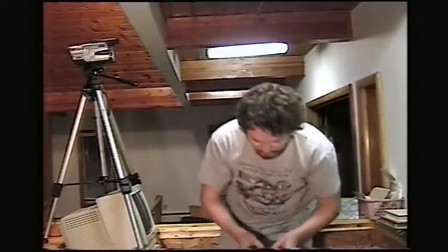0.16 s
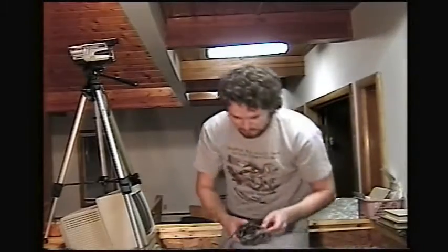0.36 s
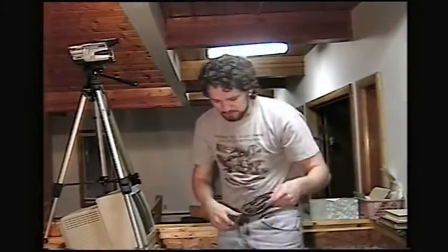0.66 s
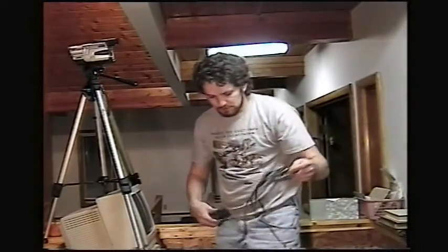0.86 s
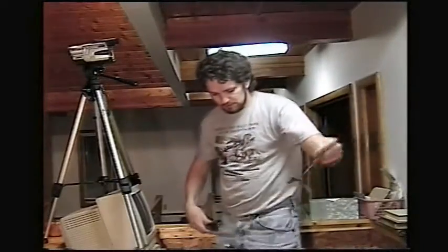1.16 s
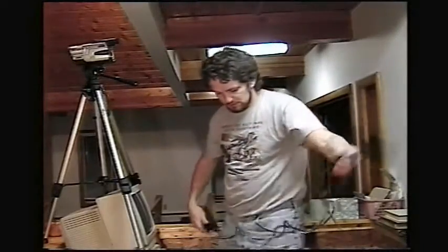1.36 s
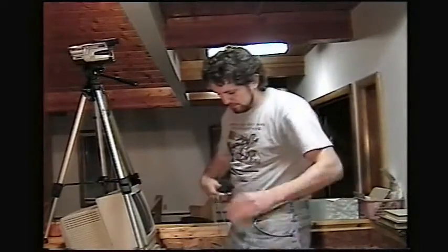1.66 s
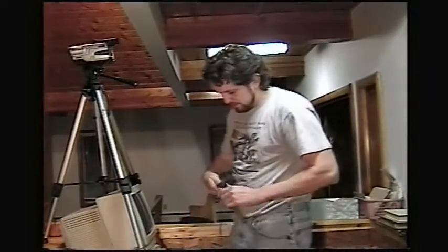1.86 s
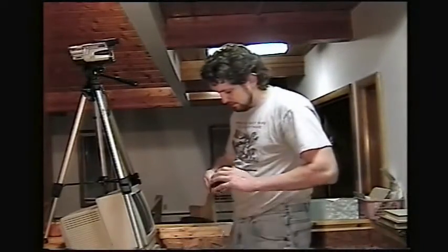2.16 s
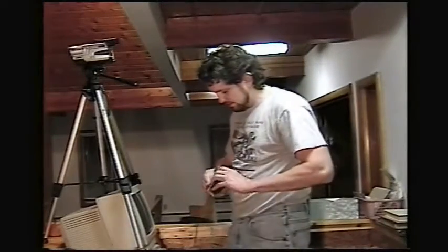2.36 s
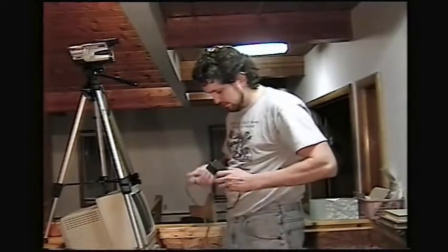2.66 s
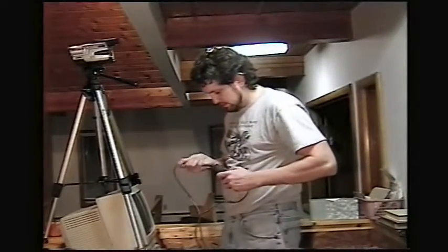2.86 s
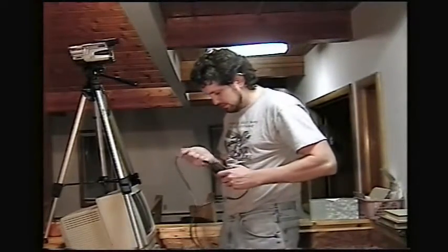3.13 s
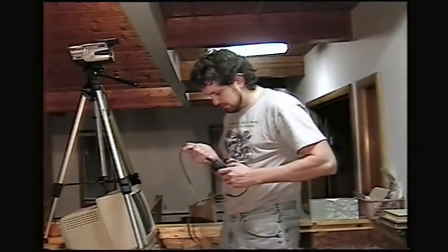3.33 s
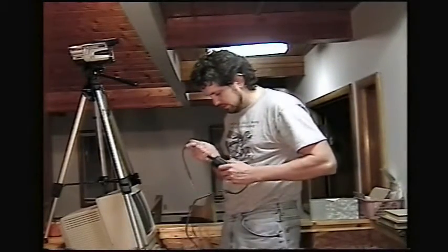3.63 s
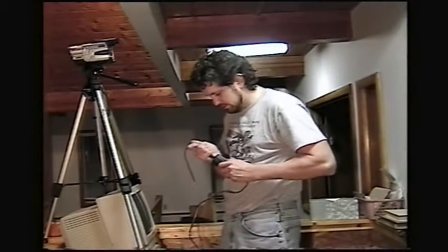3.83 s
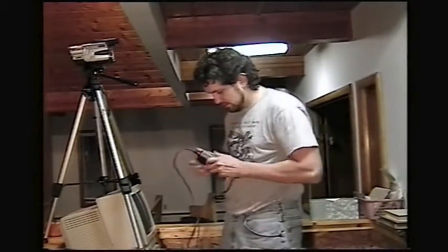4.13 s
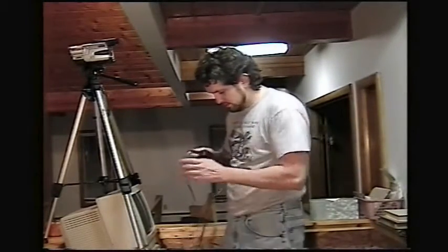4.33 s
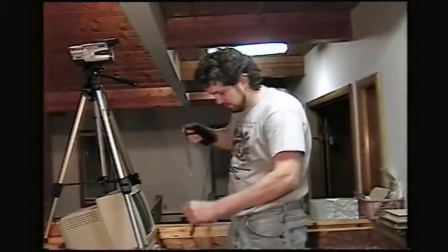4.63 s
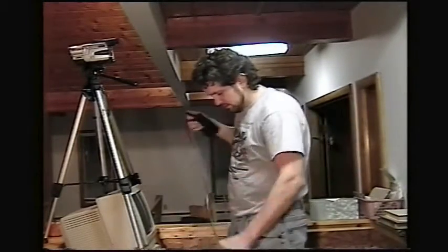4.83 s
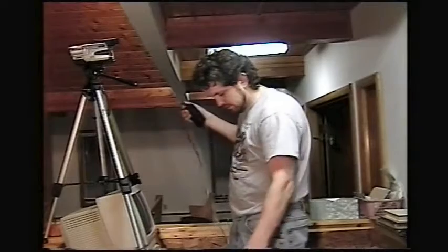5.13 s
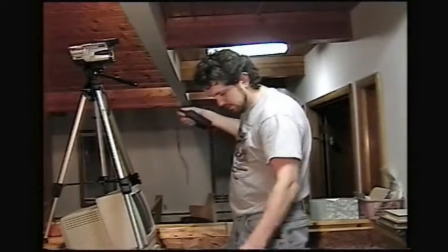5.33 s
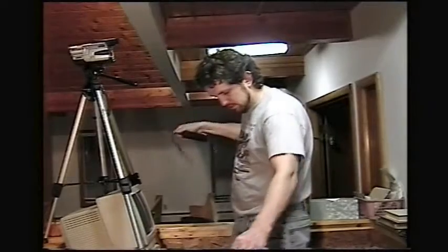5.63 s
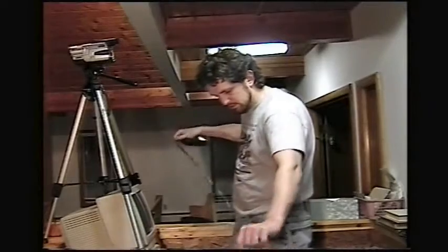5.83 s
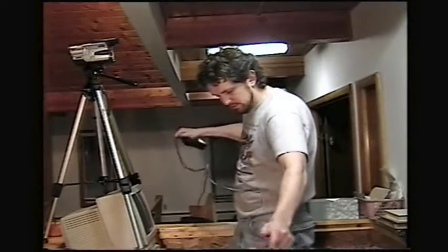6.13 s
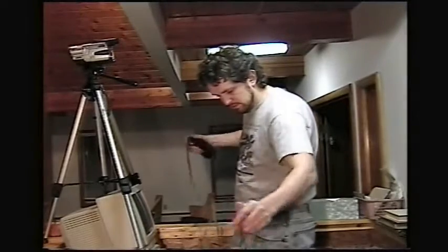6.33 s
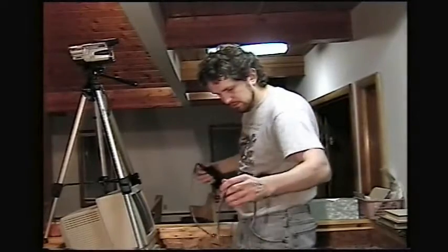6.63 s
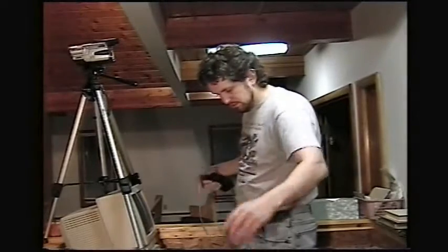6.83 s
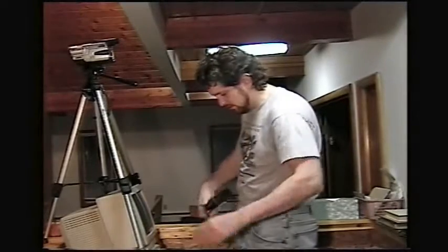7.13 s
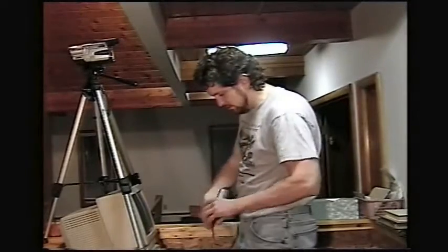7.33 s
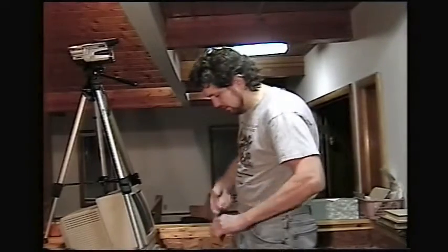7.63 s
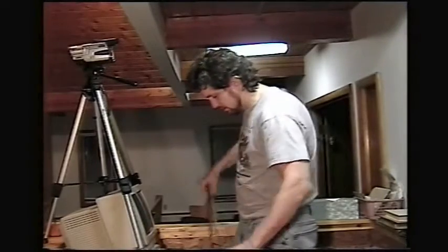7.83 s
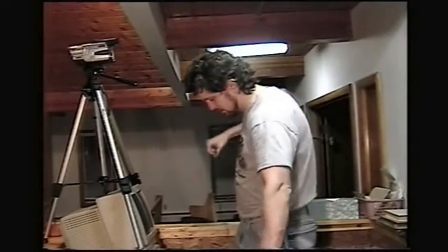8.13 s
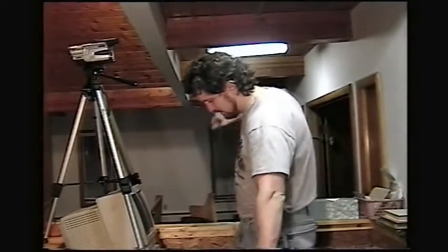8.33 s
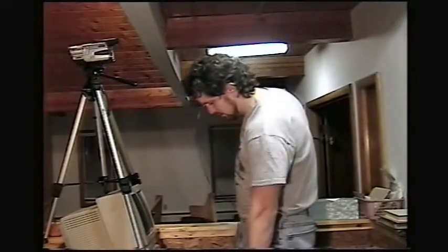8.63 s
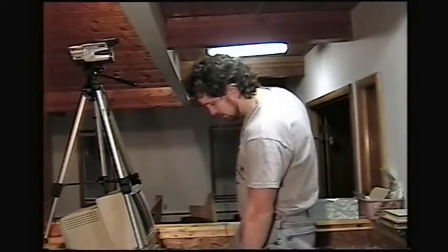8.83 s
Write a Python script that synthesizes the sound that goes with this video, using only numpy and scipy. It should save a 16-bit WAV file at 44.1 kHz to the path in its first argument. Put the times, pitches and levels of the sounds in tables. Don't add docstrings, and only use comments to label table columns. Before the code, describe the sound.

Indoors, a cord is uncoiled by hand: dry rustles and tiny squeaks, a clattering slap, then scattered hollow wooden knocks over a quiet lamp buzz.

```python
import sys
import numpy as np
from scipy import signal
from scipy.fft import rfft, irfft, next_fast_len
from scipy.io import wavfile
from scipy.ndimage import uniform_filter1d

SR = 44100
rng = np.random.default_rng(int(sys.argv[2]) if len(sys.argv) > 2 else 0)


def field_ratio(decibels):
    return 10 ** (np.asarray(decibels, dtype=float) / 20)


def generate_wav(signal):
    frames = np.transpose(np.atleast_2d(signal))
    scaled = np.clip(frames, -1, 1) * 32767
    pcm = np.round(scaled).astype(np.int16)
    wavfile.write(sys.argv[1], SR, pcm)


N = 396018
T = np.arange(N) / SR

# frequency_hz, density_db
HISS_SPECTRUM = [(29, -42.5), (50, -11.5), (119, -2), (184, -6.5), (438, -10.5), (544, -10), (581, -6.5),
                 (706, -6.5), (1020, -12), (1440, -12.5), (3220, -18.5), (4460, -17.5), (8940, -25),
                 (11600, -49.5), (19700, -120)]
# frequency_hz, level_db
LAMP_LINES = [(118.4, -95), (597.5, -77), (721.4, -79.5), (839.8, -85), (1200, -101.5), (1437, -78.5),
              (1556, -90.5), (1680, -84), (1798, -89), (2875, -91.5), (4317, -87), (7849, -91.5),
              (7881, -93.5)]
# frequency_hz, level_db
WHISTLE_LINES = [(10497, -103), (11999, -86), (13501, -102)]
# start_s, hiss_level_db
RECORDER_GAIN = [
    (0.0, -74.5),
    (1.0, -76),
    (1.7, -77.5),
    (2.8, -86),
    (3.85, -83.5),
    (6.0, -79.5),
    (7.1, -84),
]
# frequency_hz, level_db
SIDE_SPECTRUM = [(60, -30.5), (100, -41), (180, -44.5), (310, -47.5), (540, -42), (940, -25), (1630, -28),
                 (2820, -13), (4900, -17.5), (8490, -24)]
# frequency_hz, t60_s
ROOM_DECAY = [(100, 0.53), (260, 0.36), (700, 0.26), (1840, 0.2), (4850, 0.2)]
PLACE_STARTS = [0, .33, .47, .6, .75, .9, 1.1, 1.3, 1.6, 1.66, 1.8, 2.04, 2.7, 2.97, 3.2, 3.7, 3.88, 4.5,
                6.0, 6.4, 7.1, 7.7, 8.8, 9]

# start_s, level_db, pitch_hz, t60_s
FLOOR_BOOMS = [(0.229, -38, 103.3, 0.27), (0.341, -40.5, 99, 0.15), (1.101, -46.5, 99.6, 0.34),
               (1.746, -40, 161, 0.079), (2.059, -51.5, 122, 0.14), (2.529, -44.5, 119, 0.11),
               (3.936, -29.5, 188, 0.094), (6.492, -22.5, 109, 0.063), (6.699, -46.5, 106.3, 0.25),
               (7.16, -28, 161, 0.04)]
# start_s, level_db, pitch_hz, t60_s
LOOP_THUDS = [(0.717, -43, 269, 0.045), (0.786, -47, 271, 0.048), (1.736, -12.5, 259, 0.04),
              (1.882, -32, 362, 0.032), (2.85, -29.5, 245, 0.08), (3.074, -46, 257.4, 0.065),
              (4.163, -41, 304, 0.047), (5.406, -60, 358, 0.11), (6.675, -33.5, 442, 0.076),
              (6.939, -48.5, 796, 0.028), (7.398, -41.5, 296, 0.1), (7.553, -41, 241.4, 0.22),
              (7.786, -35, 268, 0.073), (8.139, -39, 947, 0.035),
              (3.91, -31, 350, 0.049),
    (3.914, -26.5, 644, 0.022),
    (7.128, -42, 640, 0.044),
    (4.4, -50, 400, 0.04),
]
# start_s, level_db, pitch_hz, t60_s
BOARD_RAPS = [
    (2.7855, -11, 867, .03),
    (2.905, -35.5, 420, .06),
    (2.955, -35, 280, .08),
    (3.932, -15.5, 795, .035),
    (3.945, -20, 289.4, .045),
    (2.7902, -18, 288.6, .06),
    (6.4432, -14.5, 775, 0.036),
    (7.796, -40, 300, .08),
    (8.9697, -13, 1156, .03),
]
# start_s, length_s, level_db, centre_hz
CABLE_PULLS = [(0.24, .2, -65.5, 3860), (0.363, 0.17, -69.5, 2000), (0.493, 0.33, -70, 4300),
               (0.88, 0.36, -69.5, 4450), (1.66, 0.095, -50.5, 4350), (1.95, 0.27, -74, 3900),
               (2.7, 0.044, -80, 4900), (4.6, 0.28, -77.5, 4650), (5.08, 0.078, -87, 4650)]
# start_s, pitch_hz, level_db
SQUEAK_LOWER = [(0.3, 4100, -63), (0.368, 3880, -73), (0.392, 3500, -63), (0.504, 3490, -77),
                (0.52, 3740, -64), (0.64, 3456, -67), (0.68, 3790, -68)]
SQUEAK_UPPER = [(0.52, 4860, -69), (0.55, 4970, -61), (0.614, 4740, -69), (0.664, 4800, -64),
                (0.76, 4850, -66)]
SQUEAK_BRIEF = [(0.96, 4200, -59), (1.01, 4160, -60.5), (1.04, 4030, -75)]
METAL_RING = [(2.07, 3740, -63), (2.2, 3750, -74.5), (2.38, 3860, -76)]
# start_s, level_db, ring_hz
CABLE_TICKS = [(0.2838, -33, 3510), (0.4803, -40.5, 3700), (0.63, -48, 3650), (0.9333, -41.5, 3810),
               (0.9994, -44.5, 4190), (1.3214, -42.5, 4300), (1.344, -34.5, 4540), (1.8712, -41, 4300),
               (1.934, -41, 3940), (1.956, -45, 4170), (2.0832, -35.5, 4430), (2.4142, -47.5, 3520),
               (2.466, -46, 4600), (3.0085, -43.5, 4480), (3.596, -46, 4800), (4.3006, -51.5, 4130),
               (4.6053, -53, 4100), (4.6407, -48.5, 4730), (4.763, -54, 4170), (4.8353, -47.5, 4840),
               (4.8973, -53, 4730), (4.941, -41.5, 4320), (5.1018, -55, 4540), (5.9006, -54.5, 4290),
               (7.4844, -52, 4000), (7.5203, -56, 4620), (7.5798, -53, 2370), (7.6246, -55.5, 3720),
               (8.2192, -57, 5000), (8.887, -50, 4200)]

# ring_hz, level_db, t60_s
FREE_PLUG_MODES = [(1310, -25, 0.13), (1860, -20, 0.11), (2064, -20, 0.11), (3346, -20, 0.05),
                   (3595, -21.5, 0.11), (4430, -18.5, 0.055), (4970, -42, .04)]
# start_s, level_db, ring_hz
SHELL_RINGS = [(0.372, -43, 1440), (1.627, -17.5, 1560), (1.8146, -31, 1290), (2.0572, -36, 1930),
               (2.5433, -40, 960), (2.9933, -36, 1780), (3.234, -40.5, 1870), (3.229, -39.5, 2360),
               (3.442, -37.5, 1276), (3.443, -37, 1850), (3.445, -40.5, 2730), (3.765, -23, 2350),
               (4.799, -35, 2464), (4.799, -42.5, 1044), (4.837, -50, 1190), (6.033, -28, 1351),
               (6.051, -30, 1050), (3.003, -48, 2896), (7.892, -41, 1970), (1.683, -17, 1800),
               (6.4437, -28, 1700), (1.814, -35, 2950), (3.764, -35.5, 1400), (7.892, -31, 1180)]
# start_s, level_db, ring_hz
PRONG_RINGS = [(1.686, -15, 4300), (1.708, -19, 4550), (1.938, -44, 8240), (2.4342, -37.5, 6180),
               (2.9893, -36, 5200), (3.2266, -41.5, 5806), (3.7626, -36, 5600), (3.931, -38, 3330),
               (4.663, -39.5, 5550), (4.7952, -47.5, 5450), (4.9397, -52.5, 5720), (6.507, -31, 3800),
               (6.507, -43, 4800), (1.6257, -19, 4614), (6.033, -14, 4750), (8.9705, -21.5, 3520),
               (7.8915, -30, 4090), (7.8915, -32.5, 3670), (3.228, -49.5, 6750), (3.01, -43, 5600),
               (3.444, -50, 5700)]
# start_s, level_db, ring_hz
HOLLOW_RINGS = [(1.736, -22, 697), (1.737, -19.5, 480), (1.74, -22.5, 257.3), (3.935, -20, 276),
                (6.449, -15.5, 281), (2.79, -20.5, 700), (2.791, -21, 286), (6.4435, -21.5, 830),
                (6.499, -21.5, 560), (7.158, -11.5, 525), (7.19, -20, 453.3), (7.785, -34, 503),
                (7.89, -31.5, 525), (8.142, -47.5, 292)]

# frequency_hz, level_db
PLUG_CONTACT = [(250, 15), (550, 29.5), (1150, 29), (1900, 20.5), (2800, 17.5), (3700, 19.5), (4600, 23.5),
                (8000, 16)]
SOFT_CABLE_CONTACT = [(250, 6.5), (550, 26.5), (1150, 30.5), (1900, 25.5), (2700, 17), (3700, 18.5),
                      (4600, 23), (8000, 15.5)]
# ring_hz, level_db, t60_s
BOARD_MODES = [(221, -4, 0.053), (269, 5, 0.11), (310, 1.5, 0.14), (396, -1, 0.16), (531, -12.5, 0.21),
               (693, -3, 0.071), (785, -20.5, 0.27), (750, -12.5, 0.11), (945, -24, 0.25),
               (1005, -2, 0.028), (1098, -48, 0.19), (1168, -38.5, 0.11)]
SHELF_MODES = [(269, -8, 0.11), (329, 5.5, 0.045), (560, -31, 0.073), (569, -20, 0.23), (753, -33.5, 0.29),
               (791, -46.5, 0.39), (890, -32.5, 0.096), (1070, -38.5, 0.12), (1100, -43, 0.16),
               (1190, -24.5, 0.093)]
BOX_MODES = [(280.4, -9.5, 0.6), (299, 2, 0.12), (407, 5, 0.13), (446.7, -7.5, 0.17), (487, -4, 0.37),
             (583, -5, 0.19), (852, -15.5, 0.17), (934, -14.5, 0.19), (1180, -34, .1)]
FLOOR_MODES = [(161, -9, 0.27), (245, -2.5, 0.26), (297, -2.5, 0.19), (586, -22.5, 0.35),
               (643, -23.5, 0.29), (678, -24.5, 0.29), (807, -10.5, 0.086), (850, -34.5, 0.24),
               (874, -22, 0.3), (1130, -26, 0.081)]
# start_s, contact_db, board_db, weight_db, softness_db
CABLE_SLAPS = [(0.189, -19.5, -85, -35.5, 37.5), (0.198, -33.5, -89, -22, 43),
               (1.6724, -13, -36, -22, 14.5), (1.6815, -18.5, -53, -18.5, 24), (1.699, -23, -44, -23.5, 24),
               (1.7143, -26, -46, -11.5, 24), (2.0542, -35.5, -76, -26, 55), (2.9891, -52, -48.5, -7, 25),
               (3.2273, -56.5, -78, -16, 9), (3.4432, -55, -85, -7.5, 25), (3.7621, -31.5, -85, -22, 20.5),
               (3.771, -36.5, -90, -26.5, 18.5), (4.7973, -46, -76, -21, 33), (6.0293, -26, -62, -12, 13.5),
               (6.0328, -17.5, -41.5, -10.5, 22), (6.041, -26.5, -57.5, -5, 21.5),
               (6.0565, -25, -62, -7.5, 19.5)]
CABLE_FLICKS = [(1.6254, -15, -36, -15.5, 34), (1.63, -27.5, -41, -21, 27), (1.8128, -29.5, -57, -12, 56),
                (1.8727, -42.5, -54, -3, 40), (1.9356, -42, -80, -13, 24), (1.9555, -42.5, -80, -8.5, 25),
                (7.782, -60, -56, 2.5, 40), (7.8915, -37.5, -46, -6, 29)]
BENCH_BLOWS = [
    (2.7852, -20, -17, -4, 33),
    (2.7895, -33, -33, 0, 35),
    (2.8095, -40, -40, -0.5, 25),
    (8.9697, -14.5, -25.5, -2, 9.1),
    (8.975, -18.5, -25, -2.5, 10),
]
SHELF_BLOWS = [
    (3.932, -36.5, -19.5, 21, 70),
]
BOX_BLOWS = [
    (6.4432, -56, -25.5, 36.2, 28.1),
    (6.4935, -30, -26, 6.8, 59.6),
    (6.499, -31.5, -28, 3.1, 65),
    (6.5055, -32, -28.5, 3.1, 55),
]
FLOOR_BLOWS = [
    (7.1564, -21, -22, -3.5, 39.7),
    (7.161, -32.5, -27.5, 4.5, 35),
    (7.1885, -24.5, -25.5, 2, 27.6),
    (7.1935, -24, -28, 0, 26.8),
    (7.1995, -27.5, -27, -1.5, 27),
    (7.2445, -45.5, -35.5, 13.5, 33),
]


def level(x, db):
    return x * field_ratio(db) / np.sqrt(np.mean(x ** 2))


def band(x, lo_hz, hi_hz):
    return signal.sosfilt(signal.butter(3, [lo_hz, hi_hz], "bandpass", fs=SR, output="sos"), x)


def colour(x, spectrum):
    hz, db = np.transpose(spectrum)
    size = next_fast_len(len(x))
    log_hz = np.log(np.arange(size // 2 + 1) * SR / size + 1)
    return irfft(rfft(x, size) * field_ratio(np.interp(log_hz, np.log(hz), db)), size)[:len(x)]


def ring(hz, t60, t):
    return np.sin(2 * np.pi * hz * t) * np.exp(-np.log(1000) * t / t60)


def add(out, s, x):
    i = int(s * SR)
    out[i:i + len(x)] += x[:N - i]


def curve(rows, column):
    return np.interp(T, np.array(rows)[:, 0], np.array(rows)[:, column])


def room_hiss():
    return level(colour(rng.standard_normal(N), HISS_SPECTRUM), -66.5)


def tones(lines, wobble_db):
    out = 0
    for hz, db in lines:
        waver = uniform_filter1d(rng.standard_normal(N), SR // 30)
        strength = field_ratio(db + 3.5 + wobble_db * waver / waver.std())
        out = out + strength * np.sin(2 * np.pi * (hz * T + rng.random()))
    return out


def recorder_gain_db():
    glide_s = 0.16
    s, db = np.transpose(RECORDER_GAIN)
    held = db[np.clip(np.searchsorted(s, T - glide_s / 2) - 1, 0, None)]
    return uniform_filter1d(held, int(glide_s * SR))


def even_noise(t):
    early_s, even_hz = 0.02, 150
    noise = rng.standard_normal(len(t))
    early = np.abs(rfft(noise * np.exp(-t / early_s))) ** 2
    early = uniform_filter1d(early, int(even_hz * len(t) / SR))
    return rfft(noise) / np.sqrt(early / early.mean())


def workshop(near, far):
    t, out = T[:SR // 2], near + far
    hz, t60 = np.transpose(ROOM_DECAY)
    octave = np.log2(np.arange(len(t) // 2 + 1) * SR / len(t) + 1)
    sent = field_ratio(-2) * near + field_ratio(3.5) * far
    for start, end in zip(PLACE_STARTS, PLACE_STARTS[1:]):
        tail, noise = 0, even_noise(t)
        for f in 70 * 2 ** np.arange(0, 7.2, 0.5):
            fall = np.log(1000) * t / np.interp(np.log(f), np.log(hz), t60)
            decay = np.exp(-2.2 * fall) + 0.34 * np.exp(-0.8 * fall)
            half_octave = np.clip(1 - 2 * np.abs(octave - np.log2(f)), 0, 1)
            tail = tail + (f / 1000) ** 0.075 * irfft(noise * half_octave, len(t)) * decay
        tail *= 1 - np.exp(-t / 0.00067)
        tail /= np.sqrt(np.sum(tail ** 2))
        add(out, start, signal.oaconvolve(sent[int(start * SR):int(end * SR)], tail))
    return out


def thuds(rows):
    out, t = np.zeros(N), T[:SR // 2]
    for s, db, hz, t60 in rows:
        modes = ring(hz, t60, t) + ring(1.17 * hz, 0.56 * t60, t)
        modes += 0.22 * ring(2.3 * hz, 0.36 * t60, t)
        add(out, s, field_ratio(db - 3) * modes * (1 - np.exp(-t / 0.002)))
    return out


def rustle():
    attack_s, release_s, sag_db_per_s, still_db = 0.16, 0.12, 12.5, -29.5
    out, t, pulls = np.zeros(N), T[:SR // 20], []
    for s, length, db, centre_hz in CABLE_PULLS:
        corners = [s - attack_s, s, s + length, s + length + release_s]
        shape_db = np.interp(T, corners, [still_db, 0, -sag_db_per_s * length, still_db], -99, -99)
        pulls.append((field_ratio(db - 10.5 + shape_db), centre_hz))
    for hz in 1400 * 1.045 ** np.arange(34):
        slips = (rng.random(N) < 400 / SR) * field_ratio(2.2 * rng.exponential(size=N))
        moving = sum(pull * (0.12 + np.exp(-(np.log(hz / centre) / 0.2) ** 2)) for pull, centre in pulls)
        out += signal.oaconvolve(slips * moving, 1.3 * ring(hz, 0.039, t))[:N]
    return out


def squeak(rows):
    sliding = 1.0 * ((T > rows[0][0]) & (T < rows[-1][0]))
    sliding = uniform_filter1d(sliding, SR // 30)
    grip = level(uniform_filter1d(rng.standard_normal(N), SR // 120), 0)
    phase = 2 * np.pi * np.cumsum(curve(rows, 1)) / SR
    return sliding * grip * field_ratio(curve(rows, 2) - 1.5) * np.sin(phase)


def ticks():
    out, t, t60 = np.zeros(N), T[:SR // 5], 0.033
    for s, db, hz in CABLE_TICKS:
        scuff = band(rng.standard_normal(len(t)) * np.exp(-t / 0.0036), 2800, 4000)
        tick = 0.33 * ring(hz, t60 / 2, t) + 0.4 * ring(0.95 * hz, t60 / 2, t) + 0.5 * scuff
        add(out, s, field_ratio(db) * tick * (1 - np.exp(-t / 0.00048)))
    return out


def plug():
    pickup_s, shell_t60_s, prong_t60_s, hollow_cycles = 0.189, 0.044, 0.037, 36
    out, t = np.zeros(N), T[:SR // 5]
    rows = [(pickup_s, db, hz, t60) for hz, db, t60 in FREE_PLUG_MODES]
    rows += [(*row, shell_t60_s) for row in SHELL_RINGS]
    rows += [(*row, prong_t60_s) for row in PRONG_RINGS]
    rows += [(*row, hollow_cycles / row[2]) for row in HOLLOW_RINGS]
    for s, db, hz, t60 in rows:
        pair = ring(hz, t60 / 2, t) + 0.099 * ring(0.93 * hz, t60 / 2, t)
        add(out, s, field_ratio(db - 10) * pair * (1 - np.exp(-t / 0.00033)))
    return out


def knocks(rows, modes, hold, bare_contact=PLUG_CONTACT, sharp=0.56):
    out, t, lead = np.zeros(N), T[:SR // 2], 200
    edges_hz = [1074, 3700, 4607, 7900]
    bend_cycles = 0.55
    for s, contact_db, board_db, weight_db, soft_db in rows:
        chatter = 0.2 * np.exp(-t / 0.0011) + 0.017 * np.exp(-t / 0.015)
        contact = sharp * (t == 0) + chatter * rng.standard_normal(len(t))
        tint = []
        for hz, bare_db in bare_contact:
            tilt_db = np.interp(np.log(hz), np.log(edges_hz), [weight_db, 0, 0, -soft_db])
            tint.append((hz, contact_db + bare_db + tilt_db))
        add(out, s - lead / SR, colour(np.roll(contact, lead), tint))
        spot = rng.standard_normal((len(modes), 2))
        board = 0
        for (hz, db, t60), (a, b) in zip(modes, spot):
            rise = (1 - np.exp(-t * hz / bend_cycles)) ** 2
            board = board + np.sign(b) * field_ratio(db + 1.2 * a) * ring(hz, hold * t60, t) * rise
        add(out, s, field_ratio(board_db + 5) * board / np.abs(board).max())
    return out


def scene():
    still = room_hiss() + tones(LAMP_LINES, 3)
    far = rustle() + ticks() + plug()
    for rows in (SQUEAK_LOWER, SQUEAK_UPPER, SQUEAK_BRIEF, METAL_RING):
        far += squeak(rows)
    far += knocks(CABLE_SLAPS, BOARD_MODES, 0.32, SOFT_CABLE_CONTACT, sharp=0.67)
    near = thuds(LOOP_THUDS + BOARD_RAPS)
    near += knocks(CABLE_FLICKS, BOARD_MODES, 0.3, SOFT_CABLE_CONTACT, sharp=0.55)
    near += knocks(BENCH_BLOWS, BOARD_MODES, 0.23) + knocks(SHELF_BLOWS, SHELF_MODES, 0.43)
    near += knocks(BOX_BLOWS, BOX_MODES, 0.35) + knocks(FLOOR_BLOWS, FLOOR_MODES, 0.28)
    quiet_gain_db = -82
    mid = workshop(near, far) + thuds(FLOOR_BOOMS) + still * field_ratio(recorder_gain_db() - quiet_gain_db)
    return np.array([mid, mid])


def top_cut(x):
    return signal.sosfilt(signal.butter(12, 13560, fs=SR, output="sos"), x)


def record(dry):
    mid = signal.sosfilt(signal.butter(4, 70, "highpass", fs=SR, output="sos"), dry.mean(axis=0))
    lead = int(0.034 * SR)
    swell = np.linspace(0.2, 0.9, lead) + 3 * np.exp(-T[lead:0:-1] / 0.0015)
    lead_noise = field_ratio(-21) * rng.standard_normal(lead) * swell / np.sqrt(lead)
    mid = mid + signal.oaconvolve(np.pad(mid, (0, lead)), lead_noise)[lead:lead + N]
    peak = 0.27
    mid = peak * np.tanh(mid / peak)
    mid = signal.sosfilt(signal.ellip(10, 0.5, 75, 9050, fs=SR, output="sos"), mid)
    grain = level(uniform_filter1d(rng.standard_normal(N), SR // 150), 0)
    side = colour(mid * grain, SIDE_SPECTRUM)
    mid = mid + tones(WHISTLE_LINES, 0.3) + level(band(rng.standard_normal(N), 10500, 15000), -94)
    side = side + level(band(rng.standard_normal(N), 200, 12000), -106)
    return top_cut(np.array([mid + side, mid - side]))


dry = scene()
out = record(dry)
generate_wav(out)
```